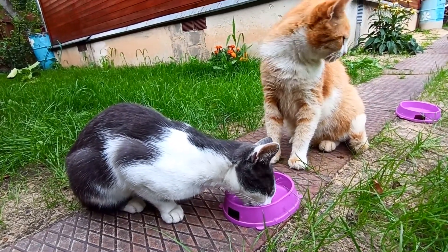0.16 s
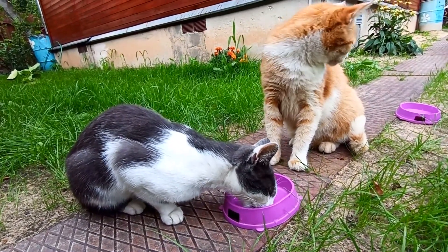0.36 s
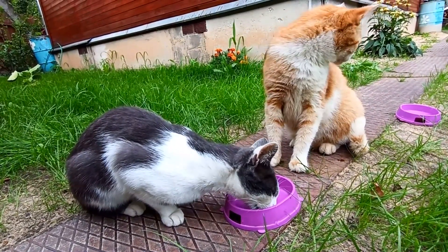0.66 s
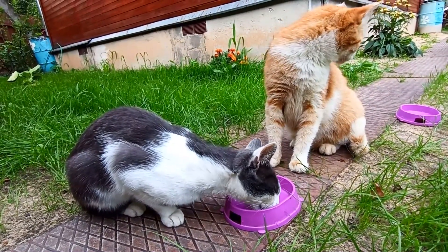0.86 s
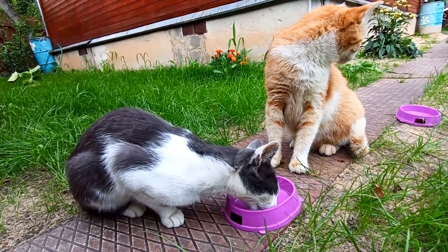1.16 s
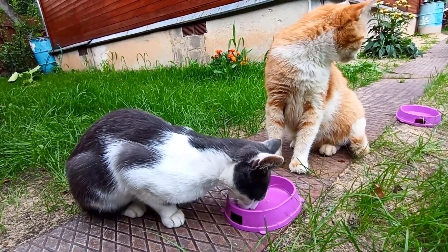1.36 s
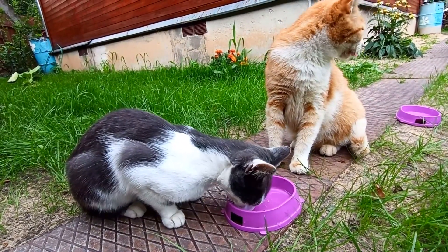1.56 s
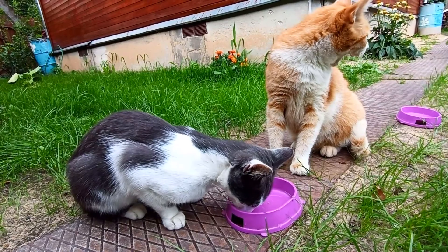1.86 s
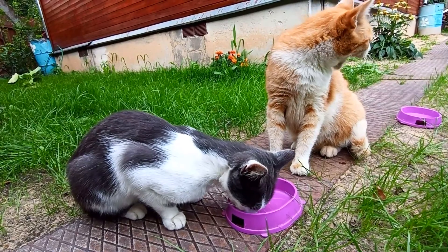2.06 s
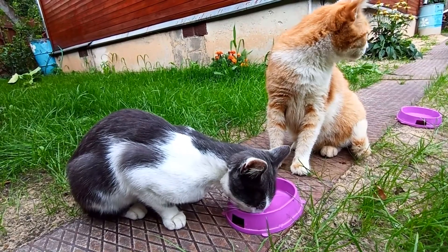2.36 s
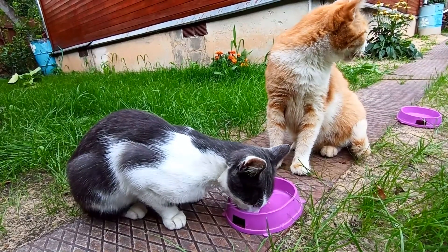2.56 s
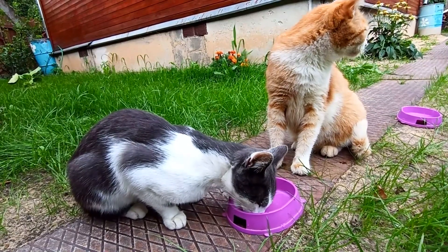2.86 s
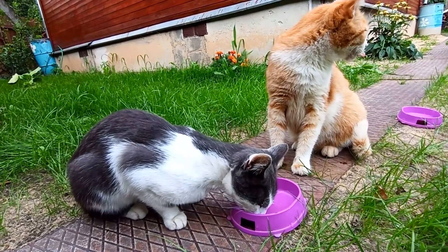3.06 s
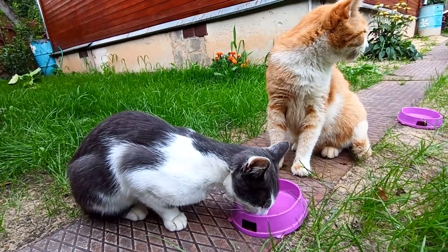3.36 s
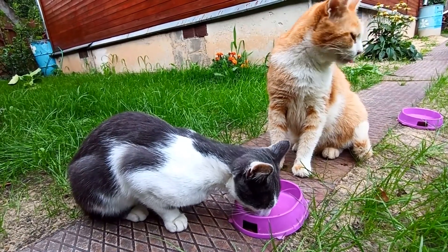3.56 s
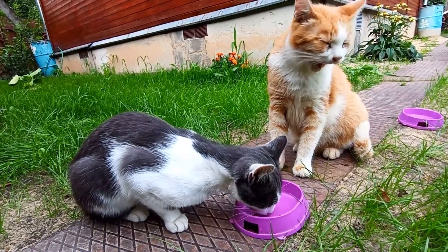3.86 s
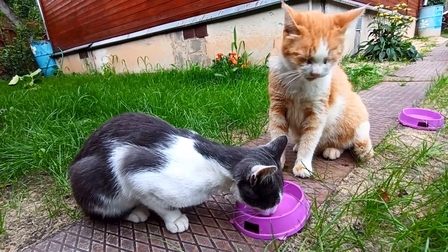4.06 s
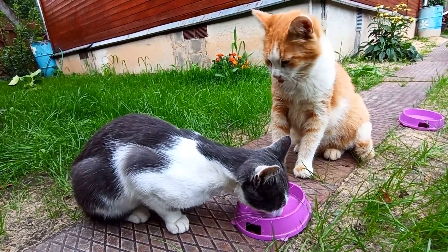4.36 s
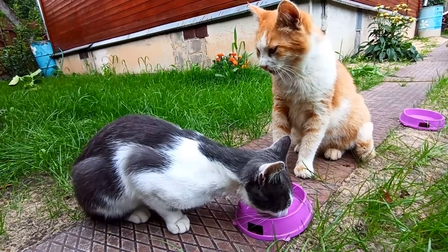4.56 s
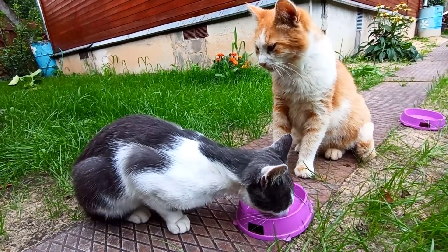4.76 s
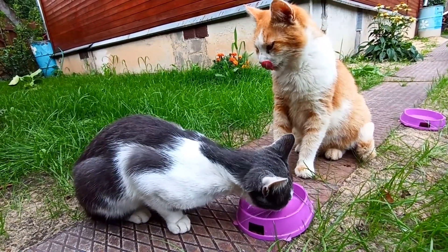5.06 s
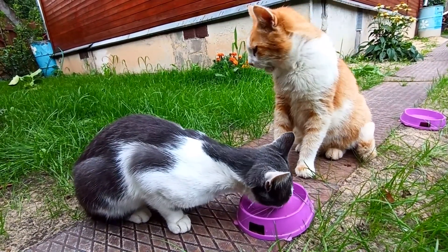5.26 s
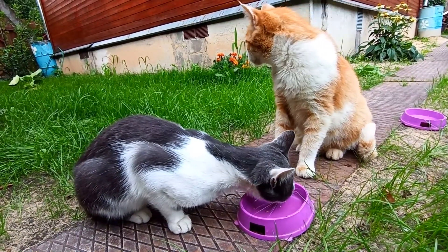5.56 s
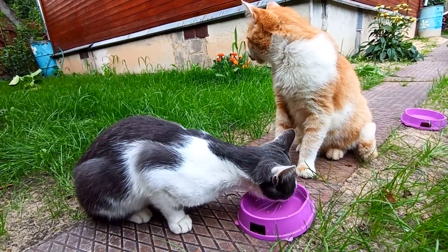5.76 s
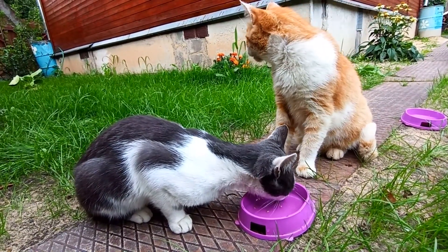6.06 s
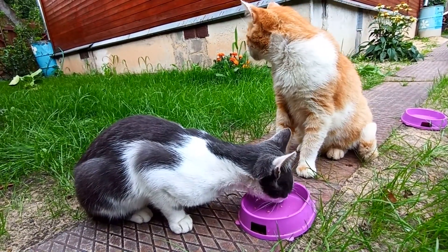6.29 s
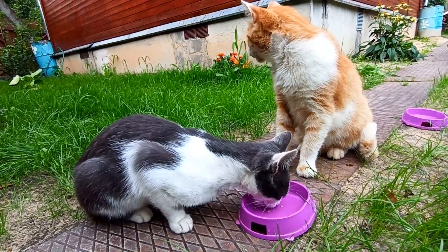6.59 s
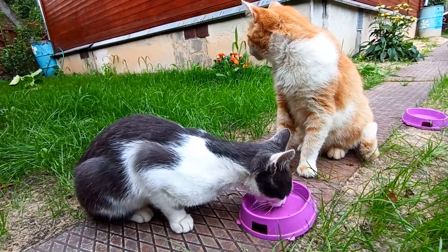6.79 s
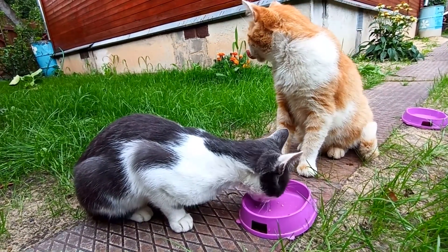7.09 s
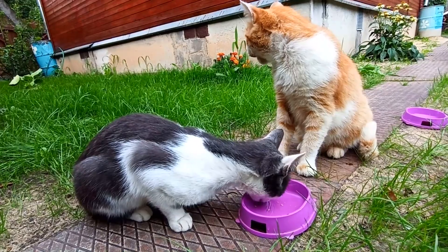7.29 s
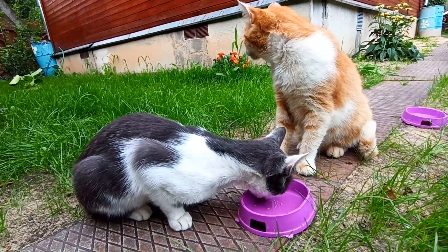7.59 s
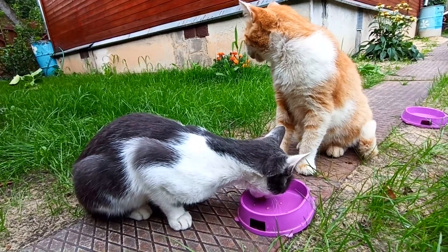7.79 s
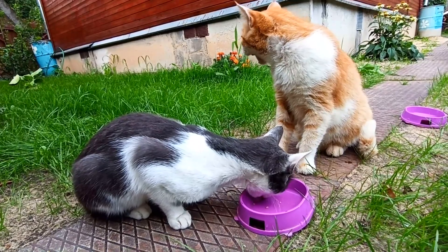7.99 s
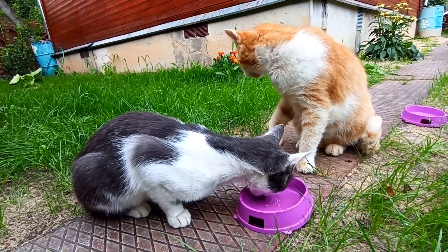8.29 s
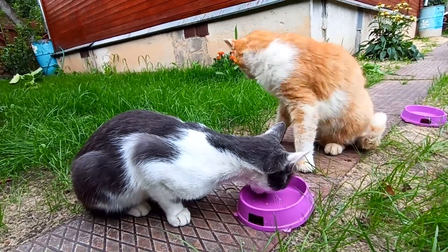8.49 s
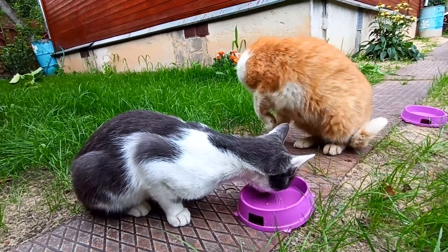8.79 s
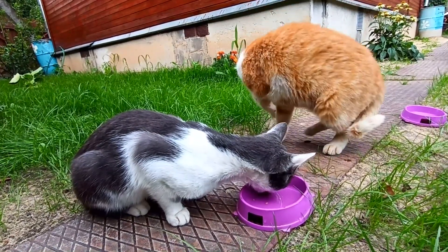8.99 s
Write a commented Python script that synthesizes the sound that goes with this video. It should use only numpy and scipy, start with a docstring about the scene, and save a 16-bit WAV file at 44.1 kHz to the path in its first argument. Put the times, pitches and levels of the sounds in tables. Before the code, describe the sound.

After a faraway dull bang, brittle kibble bites and bowl knocks sound up close as a small bird twitters, whistles and buzzes above low rumble.

```python
"""First a dull bang dies away far off in a yard, over a distant engine's drone, rumble and open air.
A thin hiss swells for almost three seconds, then cuts out. Noise makes these beds, sines the engine's orders.
A songbird close by twitters, alternates pairs of whistles with a falling buzz, then twitters again, all
as gliding sines; others answer faintly. In front a cat crunches dry kibble from a plastic bowl: bursts
of coloured noise for the bites, with small ticks of teeth and pellets and soft knocks between them."""
import sys
import numpy as np
from scipy import signal
from scipy.fft import rfft, irfft, next_fast_len
from scipy.io import wavfile
from scipy.ndimage import map_coordinates

SR = 44100
rng = np.random.default_rng(int(sys.argv[2]) if len(sys.argv) > 2 else 0)


def generate_wav(signal):
    """Clip the signal to [-1, 1] and save it as 16-bit WAV at the path in sys.argv[1]."""
    frames = np.transpose(np.atleast_2d(signal))
    scaled = np.clip(frames, -1, 1) * 32767
    pcm = np.round(scaled).astype(np.int16)
    wavfile.write(sys.argv[1], SR, pcm)


N = 403074  # samples in the scene


def amp(db):
    """Decibels to gain."""
    return 10 ** (np.asarray(db) / 20)


def unit(x):
    """Scale to rms 1."""
    return x / np.sqrt(np.mean(x ** 2) + 1e-20)


def along(points, hz):
    """Read (frequency [Hz], value) points on a log frequency axis."""
    f, v = np.transpose(points)
    return np.interp(np.log(hz + 1), np.log(f + 1), v)


def curves(rows):
    """One value per sample for each column after the time."""
    s, *columns = np.transpose(rows)
    return [np.interp(np.arange(N) / SR, s, column) for column in columns]


def clock(length):
    """Sample times [s] of a sound that lasts length seconds."""
    return np.arange(int(length * SR)) / SR


def wobble(rate, size=N):
    """A smooth random curve with rate knots a second."""
    knots = rng.standard_normal(int(size * rate / SR) + 4)
    return map_coordinates(knots, [np.arange(size) * rate / SR])


def filtered(x, response):
    """Apply a response given as a function of frequency."""
    size = x.shape[-1]
    padded = next_fast_len(size + 4096)
    spectrum = rfft(x, padded) * response(np.fft.rfftfreq(padded, 1 / SR))
    return irfft(spectrum, padded)[..., :size]


def add(out, s, x):
    """Mix x into out from time s."""
    start = max(round(s * SR), 0)
    part = out[..., start:start + x.shape[-1]]
    part += x[..., :part.shape[-1]]


def rush(spectrum, alike, size=N):
    """Stereo noise of rms 1 with a given colour and left-right likeness."""
    def mid_and_side(hz):
        turn = np.arccos(np.clip(along(alike, hz), -1, 1)) / 2
        return amp(along(spectrum, hz)) * [np.cos(turn), np.sin(turn)]

    mid, side = filtered(rng.standard_normal((2, size)), mid_and_side)
    return unit(np.array([mid + side, mid - side]))


def tone(hz):
    """A sine of rms 1 that follows a pitch curve."""
    return np.sqrt(2) * np.sin(2 * np.pi * np.cumsum(hz) / SR)


def gate(t, rise, fall):
    """Smooth opening and closing of a note, in seconds."""
    nearest_end = np.minimum(t / rise, (t[-1] - t) / fall)
    return np.sin(np.pi / 2 * np.clip(nearest_end, 0, 1)) ** 2


def outdoors(x, wet_db, t60, walls):
    """Direct sound plus quickly fading reflections, about walls per second, different in each channel."""
    t = clock(.4)
    arrivals = rng.random((2, len(t))) < walls / SR
    echo = rng.standard_normal((2, len(t))) * arrivals * amp(-60 * t / t60)
    echo /= np.linalg.norm(echo, axis=1, keepdims=True) + 1e-9
    return x + amp(wet_db) * signal.fftconvolve(np.atleast_2d(x), echo, axes=1)[:, :N]


# Speed of the far engine: (time [s], speed [cycles per second])
FAR_ENGINE_SPEED = [(0, 17.0), (.4, 17.1), (.65, 16.3), (1.0, 16.8), (1.5, 17.0), (1.9, 16.0), (2.3, 16.1),
                    (2.75, 17.9), (3.3, 19.15), (4.6, 19.6), (5.5, 18.9), (6.2, 18.7), (6.6, 17.1),
                    (7.1, 16.4), (7.6, 16.4), (8.2, 16.9), (8.7, 16.6), (9.14, 15.9)]
# Strength of the far engine's orders by their pitch: (frequency [Hz], level [dB])
FAR_ENGINE_ORDERS = [(65, -28.5), (84, -8), (100, -5.5), (118, -7), (136, 1.5), (153, -3.5), (170, -11),
                     (187, -21), (205, -12.5), (222, -22.5), (260, -28), (310, -31), (345, -28),
                     (405, -21.5), (450, -33.5)]
# Colour of the low rumble: (frequency [Hz], level per hertz [dB])
RUMBLE_COLOUR = [(25, -24.5), (55, -23), (82, -7.5), (135, 0), (175, -6.5), (210, -5.5), (255, -14),
                 (390, -14), (500, -23), (800, -28), (1300, -47)]
# Colour of the open air around the yard: (frequency [Hz], level per hertz [dB])
AIR_COLOUR = [(290, -34), (500, -0.5), (900, -5), (1450, -7), (2200, -9), (2700, -10), (3000, -10),
              (4600, -8.5), (5000, -22), (5900, -20.5), (6350, -8.5), (7600, -10.5), (9800, -35),
              (12100, -32.5), (15500, -24)]
# The thin hiss as it swells and cuts out: (time [s], level [dB])
HISS_LEVEL = [(0, -65.5), (1.6, -53.5), (2.72, -51), (2.87, -83), (9.14, -96)]
# Left-right likeness of the yard's noise beds and the scuffs: (frequency [Hz], likeness [1 = same])
YARD_LIKENESS = [(30, 0.79), (70, 0.94), (140, 0.9), (280, 0.77), (550, 0.45), (1500, 0.016),
                 (10000, 0.037)]
HUM_DB, RUMBLE_DB, AIR_DB = -35.5, -35, -52.5  # mean gains of engine, rumble and open air
HUM_SWELL_DB, HUM_SWELLS_PER_S = 0.7, 6  # the engine's sound drifts on the air
THROB_DB = 1.5  # every other cycle of the engine is stronger


def background(count):
    """A far engine's orders, from 4 to below count, follow its speed and throb over rumble, air and hiss."""
    cycle = curves(FAR_ENGINE_SPEED)[0] * (1 + 0.004 * wobble(3))
    engine = 0
    for order in range(4, count):
        order_level = along(FAR_ENGINE_ORDERS, order * cycle) + 1.66 * wobble(7)
        engine = engine + amp(order_level) * tone(order * cycle + 1.0 * wobble(10))
    throb = THROB_DB * tone(cycle / 2)
    hum = amp(HUM_DB + HUM_SWELL_DB * wobble(HUM_SWELLS_PER_S) + throb) * engine
    rumble = amp(RUMBLE_DB) * rush(RUMBLE_COLOUR, YARD_LIKENESS)
    air = amp(AIR_DB + 0.8 * wobble(8)) * rush(AIR_COLOUR, YARD_LIKENESS)
    hiss_colour = [(5000, -52.5), (6900, -3.5), (7700, 13.0), (8600, -1), (11000, -36.0), (15000, -29.0)]
    hiss = amp(curves(HISS_LEVEL)[0]) * rush(hiss_colour, YARD_LIKENESS)
    return (hum + rumble) * amp([[.2], [-.2]]) + air + hiss


# Colour of the far bang before its ring: (frequency [Hz], level per hertz [dB])
BANG_COLOUR = [(120, -23.5), (205, 0.5), (266, -18), (315, 0.5), (360, -15.5), (504, -10.5), (680, -19),
               (894, -14.5), (1250, -19), (1660, -29), (2300, -25), (5600, -40), (7400, -32), (8500, -36.5),
               (9500, -64.5)]
BANG_RING_HZ, BANG_RING_WIDTH_HZ, BANG_RING_DB = 898, 76, 8.5  # one pitch stands out


def bang():
    """Dull noise with one emphasized pitch; an uneven decay stands for lumpy echoes among the houses."""
    level, = curves([(0, -60), (.012, -41), (.022, -28), (.075, -28), (.17, -38), (.45, -57.5), (.9, -110)])

    def ring(hz):
        return amp(BANG_RING_DB / (1 + (2 * (hz - BANG_RING_HZ) / BANG_RING_WIDTH_HZ) ** 2))

    noise = rush(BANG_COLOUR, [(200, 1.0), (1000, 0.22)])
    return amp(level + 1.5 * wobble(120)) * unit(filtered(noise, ring))


# Faint answers from far birds:
# (time [s], length [s], start pitch [Hz], end pitch [Hz], level [dB])
FAR_ANSWERS = [(1.162, 0.14, 4800, 4300, -62), (1.45, 0.11, 8000, 6900, -52),
               (1.651, .11, 7280, 6700, -47.5), (6.57, 0.21, 2590, 2760, -64),
               (7.136, 0.15, 2540, 2850, -60), (7.647, 0.12, 2810, 2950, -58.5)]


def answers(roughness_hz):
    """Far birds: thin sines glide with a rough pitch, swell and fade."""
    out = np.zeros(N)
    for s, length, start_hz, end_hz, db in FAR_ANSWERS:
        t = clock(length)
        pitch = np.interp(t, [0, length], [start_hz, end_hz])
        pitch += roughness_hz * wobble(495, size=len(t))
        add(out, s, amp(db) * gate(t, 0.0088, 0.018) * tone(pitch))
    return out


# Slurred notes of the near bird, one curve each: (time [s], pitch [Hz], level [dB])
SLURRED_NOTES = [
    [(.879, 3435, -36.5), (.898, 3490, -31), (.909, 3950, -49)],
    [(.902, 2360, -51), (.917, 2570, -47), (.926, 2880, -38), (.935, 2750, -43), (.947, 3140, -31),
     (.957, 3014, -36), (.970, 3150, -31.5), (.993, 3030, -35.5)],
    [(1.340, 3280, -48), (1.359, 3500, -57)],
    [(1.945, 2880, -44), (1.954, 2600, -41), (1.972, 2850, -48)],
    [(1.974, 3530, -27), (1.987, 3465, -28.5), (1.995, 3650, -24), (2.08, 3610, -30), (2.122, 3355, -29),
     (2.134, 2980, -34.5), (2.145, 2300, -57)],
    [(7.910, 3850, -37), (7.915, 3300, -32.5), (7.921, 3300, -47), (7.929, 3220, -55), (7.935, 2750, -57)],
    [(8.262, 5220, -52), (8.280, 10300, -38), (8.293, 6360, -49), (8.305, 4960, -24.5)],
    [(8.304, 5900, -42), (8.318, 4120, -27.5), (8.336, 3410, -37)],
    [(8.538, 5830, -45), (8.544, 5030, -34.5), (8.551, 3700, -43)],
    [(8.664, 5200, -44), (8.671, 6260, -55), (8.678, 5030, -35), (8.684, 4280, -36), (8.691, 4720, -37),
     (8.695, 5340, -38), (8.703, 3680, -35)],
]


def slurs():
    """Pure notes glide from pitch to pitch."""
    out = np.zeros(N)
    for rows in SLURRED_NOTES:
        s, hz, db = np.transpose(rows)
        t = clock(max(s[-1] - s[0], .005))
        pitch = np.interp(s[0] + t, s, hz) + 18 * wobble(161, size=len(t))
        level = np.interp(s[0] + t, s, db)
        add(out, s[0], amp(level) * gate(t, 0.0011, 0.0017) * tone(pitch))
    return out


# Two-voiced wheezes of the near bird: (time [s], length [s], pitch [Hz], opening rise [Hz], drift [Hz],
# first gap between voices [Hz], last gap [Hz], trill scale [Hz], level [dB], upper voice [dB])
WHEEZE_NOTES = [(0.999, 0.052, 2640, 200, -28, 557, 607, 15, -47.5, 8.5),
                (1.088, 0.072, 2820, 298, -150, 523, 440, 15, -54.5, 7.5),
                (1.154, 0.2, 2674, 40, 242, 317, 480, 8, -57, 7.5),
                (2.18, 0.16, 3010, 169, 84, 373, 427, 8, -58.5, 11),
                (7.927, 0.25, 3630, 40.2, 164, 430, 301, 25, -52.5, 0.5),
                (8.449, .094, 5610, 2500, -1650, 556, 2130, 150, -37.5, -4),
                (8.589, .090, 4390, 1040, -200, 755, 850, 160, -37.5, -1),
                (8.737, .118, 4630, 1290, -600, 640, 750, 160, -40.5, -3),
                (8.893, 0.1, 3750, 450, -120, 400, 430, 43, -49, 1)]
WHEEZE_RISE_SHARE = .35  # time constant of the opening rise, as a share of the note
TRILL_HZ, TRILL_SLOWING = 181, 0.55  # mean opening rate; share of it lost by the end of a note


def wheezes():
    """Both sides of the syrinx sing and beat harshly; pitch scoops up, trills and drifts as the gap shifts."""
    out = np.zeros(N)
    for (s, length, hz, rise_hz, drift_hz, first_gap_hz, last_gap_hz,
         trill_hz, db, upper_db) in WHEEZE_NOTES:
        t = clock(length)
        progress = t / length
        arch = np.sin(np.pi * progress)
        rate = TRILL_HZ * (1 - TRILL_SLOWING * progress) * (1 + 0.13 * wobble(48, size=len(t)))
        trill = np.sqrt(arch * (1 - progress)) * tone(rate) + 0.31 * wobble(700, size=len(t))
        scoop = rise_hz * np.exp(-progress / WHEEZE_RISE_SHARE)
        pitch = hz + drift_hz * progress + trill_hz * trill - scoop + 14 * wobble(145, size=len(t))
        gap = first_gap_hz + (last_gap_hz - first_gap_hz) * progress
        gap *= 1 + 0.047 * wobble(120, size=len(t))
        # the coupled sides add a combination tone
        upper = tone(pitch + gap) + amp(-19) * tone(pitch + 2 * gap)
        voices = tone(pitch) + amp(upper_db) * np.sqrt(arch) * upper
        level = db + 2 * (arch - .7) + 1.7 * wobble(74, size=len(t))
        add(out, s, amp(level) * gate(t, 0.0035, 0.0072) * voices)
    return out


# Chips of the near bird: (time [s], length [s], top pitch [Hz], share of the chip before the top,
# fall one chip length from the top [Hz], level [dB])
CHIP_NOTES = [(0.862, 0.021, 3030, 0.49, 656, -44.5), (1.054, .017, 2950, 0.55, 600, -39.5),
              (7.341, .010, 3750, .1, 500, -54), (7.364, 0.009, 3500, .1, 600, -46),
              (7.394, .012, 3280, 0.59, 700, -44.5), (7.481, 0.0092, 5300, 0.51, 1310, -40.5),
              (7.488, 0.0077, 4320, .1, 900, -40.5), (7.610, 0.0077, 3700, .15, 550, -34.5),
              (7.620, 0.0081, 4970, .15, 1200, -45.5), (7.632, .007, 3430, .1, 700, -38),
              (7.676, 0.013, 3900, 0.47, 1400, -32.5), (7.69, 0.01, 5400, .5, 900, -46),
              (7.726, .005, 5200, .9, 1400, -41), (7.733, 0.0061, 3530, .09, 900, -37.5),
              (7.786, .013, 3960, 0.37, 1380, -29.5), (7.802, 0.0085, 5380, .5, 900, -48),
              (7.831, 0.029, 3230, 0.48, 650, -52), (7.845, 0.0065, 4500, 0.37, 700, -40.5),
              (7.852, 0.0054, 3460, 0.12, 900, -39), (7.906, 0.0043, 4150, .5, 900, -37),
              (8.343, 0.02, 5900, 0.49, 2000, -41)]


def chips():
    """Very short notes: the pitch arches up to a top and drops away."""
    out = np.zeros(N)
    for s, length, top_hz, top_share, drop_hz, db in CHIP_NOTES:
        t = clock(length)
        pitch = top_hz - drop_hz * np.abs(t / length - top_share) ** 1.01
        add(out, s, amp(db) * gate(t, 0.0013, 0.0037) * tone(pitch))
    return out


# Falling buzzes of the near bird:
# (time [s], length [s], top pitch [Hz], held pitch [Hz], head level [dB], tail level [dB])
BUZZ_NOTES = [(3.481, 0.3, 3460, 3250, -33.5, -47.5), (4.277, 0.32, 4200, 3430, -28.5, -44.5),
              (5.099, 0.29, 4230, 3510, -28, -39), (5.939, 0.301, 4270, 3540, -28, -40.5),
              (6.748, 0.29, 4140, 3437, -28, -39.5)]
BUZZ_HEAD_S, BUZZ_SAG_HZ_PER_S = 0.15, 452  # time to reach the tail level; sinking of the held pitch
BUZZ_TOP_S, BUZZ_SCOOP_HZ = 0.011, 200  # the pitch scoops up to its top before it falls
RASP_DB, RASP_GAP_HZ, RASP_FADE_DB_PER_S = -8.5, 289.5, 52  # a second, higher voice roughens the head


def buzzes(flutter_hz, depth_hz):
    """An arching, falling note with fast pitch flutter; a loud, rasping head sinks to a quiet held tail."""
    out = np.zeros(N)
    for s, length, top_hz, held_hz, head_db, tail_db in BUZZ_NOTES:
        t = clock(length)
        fall = np.exp(-(np.maximum(t - BUZZ_TOP_S, 0) / 0.021) ** 1.3)
        pitch = held_hz - BUZZ_SAG_HZ_PER_S * np.maximum(t - .1, 0) + (top_hz - held_hz) * fall
        pitch -= BUZZ_SCOOP_HZ * np.maximum(1 - t / BUZZ_TOP_S, 0)
        pitch += 34 * wobble(500, size=len(t)) + 20 * wobble(35, size=len(t))
        flutter = tone(flutter_hz * (1 + 0.018 * wobble(70, size=len(t))))
        pitch += depth_hz * flutter * (1 - np.exp(-t / BUZZ_TOP_S))
        rasp_pitch = pitch + RASP_GAP_HZ + 60 * wobble(300, size=len(t))
        rasp = amp(RASP_DB - RASP_FADE_DB_PER_S * t) * tone(rasp_pitch)
        head_shape = [head_db - 12.5, head_db - 1.0, head_db - 3.5, tail_db]
        level = np.interp(t / BUZZ_HEAD_S, [0, .25, .55, 1], head_shape)
        level = level - 1.8 * flutter + 1.1 * wobble(90, size=len(t))
        add(out, s, amp(level) * gate(t, 0.0082, 0.038) * (tone(pitch) + rasp))
    return out


# Whistles of the near bird: (time [s], length [s], level [dB], pitch [Hz], sag [Hz per s],
# fade [dB per s], left minus right [dB], depth of the closing dip [Hz])
WHISTLE_NOTES = [(3.85, 0.11, -30.5, 4858, 100, 9, -1.5, 16), (4.056, 0.1, -28.5, 4906, 500, 18, 0.5, 13),
                 (4.66, 0.11, -29, 4968, -3, 10, -1, 77), (4.864, 0.102, -28.5, 4962, -200, 13, 2, 113),
                 (5.465, 0.11, -30.5, 4980, 1499, 115, 2.5, 3), (5.708, 0.12, -28, 4886, 298, -4, 3, 15),
                 (6.318, 0.1, -26, 4980, 1402, 50, -2, 0), (6.523, 0.11, -28.5, 4885, 900, 29, 4.5, 106)]
# Faint overtones of a whistle: (multiple of its pitch, level [dB])
WHISTLE_OVERTONES = [(1.801, -23), (2, -27.5)]
SETTLE_HZ, SETTLE_S = 170, 0.0049  # it starts sharp and settles
SWELL_DB, SWELL_S = 13.5, 0.0067  # it starts soft and swells
DIP_LEAD_S, DIP_S = 0.025, 0.0093  # the closing dip: time before the end, width
FLICK_HZ, FLICK_S = 170, 0.0082  # it ends with an upward flick


def whistles():
    """Nearly pure notes settle, sag, dip and flick up, with a slight quaver and faint overtones."""
    out = np.zeros((2, N))
    for s, length, db, hz, sag, fade_db, pan_db, dip_hz in WHISTLE_NOTES:
        t = clock(length)
        from_middle, left = t - length / 2, length - t
        flick = FLICK_HZ * np.exp(-left / FLICK_S)
        dip = dip_hz * np.exp(-((left - DIP_LEAD_S) / DIP_S) ** 2)
        pitch = hz + SETTLE_HZ * np.exp(-t / SETTLE_S) - sag * from_middle + flick - dip
        pitch += 14 * wobble(230, size=len(t)) + 9 * wobble(44.4, size=len(t))
        level = db - fade_db * from_middle - SWELL_DB * np.exp(-t / SWELL_S) + wobble(67, size=len(t))
        voice = tone(pitch)
        for multiple, over_db in WHISTLE_OVERTONES:
            voice = voice + amp(over_db) * tone(multiple * pitch)
        pan = amp([[pan_db / 2], [-pan_db / 2]])
        add(out, s, amp(level) * gate(t, 0.0026, 0.024) * voice * pan)
    return out


# Soft knocks in the bowl: (time [s], level before attack and decay [dB], pitch [Hz])
SOFT_KNOCKS = [(.344, -41, 1110), (.412, -36.5, 820), (.666, -39, 1160), (.916, -38, 806),
               (1.989, -37, 800), (2.379, -31, 1320), (2.4088, -22, 1193), (2.956, -35.5, 1270),
               (2.998, -20.5, 2710), (2.999, -26, 1210), (4.263, -35.5, 1890), (4.337, -34.5, 760),
               (5.175, -34.5, 775), (5.227, -38.5, 795), (6.968, -36, 1450)]
KNOCK_ATTACK_S, KNOCK_T60_S = 0.0019, 0.028  # a padded contact; its ring
KNOCK_LOW_DB, SCUFF_DB = -9, -4.5  # lower mode and dry pellet scuff, relative to the main mode


def knocks():
    """A pellet scuffs the bowl, which rings briefly in a woody mode and a weaker lower one."""
    out, t = np.zeros(N), clock(.06)
    for s, db, hz in SOFT_KNOCKS:
        pitch = hz * (1 + 0.044 * wobble(400, size=len(t)))
        scuff_colour = [(hz / 5, -30), (hz / 2, -5), (hz, 0), (hz * 2, -8), (hz * 6, -28)]
        scuff = rush(scuff_colour, YARD_LIKENESS, size=len(t))[0]
        ring = tone(pitch) + amp(KNOCK_LOW_DB) * tone(.66 * pitch) + amp(SCUFF_DB) * scuff
        attack = 1 - np.exp(-t / KNOCK_ATTACK_S)
        add(out, s, amp(db - 60 * t / KNOCK_T60_S) * attack * ring)
    return outdoors(out, wet_db=-13, t60=.09, walls=2600) * amp([[-2.2], [2.2]])


# Sharp ticks of teeth and pellets: (time [s], onset level before the ticks' common gain [dB], pitch [Hz])
SHARP_TICKS = [(.2394, -34, 7100), (1.5673, -33.5, 7000), (1.582, -37, 15000), (1.6267, -33, 6800),
               (1.7714, -33, 6830), (1.9432, -23.5, 7280), (2.4857, -34, 7000), (2.5517, -34.5, 7040),
               (2.717, -30.5, 7020), (5.268, -40, 4500), (5.411, -41.5, 6800), (7.961, -35.5, 7000),
               (7.3672, -41.5, 6930), (7.664, -32, 6900), (7.671, -33, 7000), (8.2015, -30, 6900),
               (8.3064, -32, 6960), (8.470, -28, 6400), (8.5966, -32, 7030), (9.0817, -32.5, 7230)]
TICK_HZ = 7020  # where a chance tick rings, give or take 5 %
FAINT_TICK_DB, FAINT_SPREAD_DB = -39.5, 1  # chance ticks, before the common gain


def chewing(count):
    """The sharp ticks plus count faint ones at chance times, as rows like those of the table."""
    faint = []
    for _ in range(count):
        s = rng.uniform(0, N / SR)
        db = FAINT_TICK_DB + FAINT_SPREAD_DB * rng.standard_normal()
        faint.append((s, db, TICK_HZ * np.exp(0.05 * rng.standard_normal())))
    return list(SHARP_TICKS) + faint


def contacts(rows, gain_db, t60, octaves, skirt_db):
    """Each small contact rings for a moment in one broad resonance of noise."""
    out, t = np.zeros((2, N)), clock(0.067)
    for s, db, hz in rows:
        shape = [(hz / 8, skirt_db - 4.5), (hz / 2 ** octaves, skirt_db), (hz, 0),
                 (hz * 2 ** octaves, skirt_db), (hz * 8, skirt_db - 18.5)]
        ring = rush(shape, [(1000, 0.88), (7000, 0.11)], size=len(t))
        add(out, s, amp(db + gain_db - 60 * t / t60) * ring)
    return outdoors(out, wet_db=-6, t60=0.1, walls=1500)


# Resonances of the plastic bowl: (frequency [Hz], width [Hz], lift [dB])
BOWL_RESONANCES = [(717, 230, 12), (1257, 200, 8.5), (1776, 86, 10), (2014, 170, 6.5), (2600, 210, 5.5),
                   (4030, 1000, 1.5), (6350, 400, 5.5), (7340, 120, 14.5)]


def bowl(hz):
    """Gain of the bowl's resonances, each a bell-shaped lift in decibels."""
    return amp(sum(db / (1 + (2 * (hz - centre) / width) ** 2) for centre, width, db in BOWL_RESONANCES))


# Colour of breaking kibble before the bowl: (frequency [Hz], level per hertz [dB])
KIBBLE_COLOUR = [(250, -37), (500, -14.5), (800, -10.5), (1300, -6.5), (2200, -10.5), (3800, -3),
                 (4600, -8.5), (5300, -18), (6500, -7.5), (7500, -16), (8600, -20.5), (9800, -23),
                 (12300, -27.5), (15500, -26)]
BODY_OCTAVES = 0.22  # width of the lift around one pitch


def kibble(size, tilt_db, body_hz, body_db):
    """Breaking kibble in the bowl, lifted at one pitch and tilted, as stereo noise of rms 1."""
    grit = rush(KIBBLE_COLOUR, [(800, 0.7), (4000, 0.15), (9000, 0.21)], size=size)

    def response(hz):
        body = body_db * np.exp(-(np.log2((hz + 1) / body_hz) / BODY_OCTAVES) ** 2)
        tilt = tilt_db * np.log2(np.clip(hz, 700, 8000) / 3000)
        return bowl(hz) * amp(body + tilt)

    return unit(filtered(grit, response))


# The cat's bites: (time [s], length [s], level before balance [dB], treble tilt [dB per octave],
# pitch of the mouth's hollow [Hz], its lift [dB])
CAT_BITES = [(0.6, 0.0087, -34.5, 0, 1460, 7), (1.129, 0.013, -40, 0, 1350, 1),
             (1.738, .003, -39, 1.5, 1520, 12), (2.093, 0.018, -33, -2.5, 1510, 6),
             (2.378, 0.0026, -41.5, 2, 1330, 4), (2.397, .018, -39, 0, 1750, 2.5),
             (2.667, 0.026, -41.5, -2, 1400, 4), (2.981, 0.016, -30.5, -1.5, 1710, 3.5),
             (2.998, 0.028, -27, 2, 2160, 3.5), (3.29, 0.013, -39.5, 0.5, 2050, 7),
             (4.253, 0.016, -40, 1.5, 1880, 6), (4.560, 0.015, -42, 2, 1380, 1),
             (6.839, .018, -43.5, 1.5, 2200, 3), (8.024, .006, -35, 2, 1350, 5.5),
             (8.042, .009, -39, 1, 2600, 6), (8.09, 0.027, -41, 1.5, 1400, 3),
             (8.484, 0.017, -31, 2.5, 1500, 6), (8.775, .019, -36, 1.5, 2150, 1)]
# Sharp cracks as a pellet splits: (time [s], onset level before balance [dB],
# treble tilt [dB per octave], pitch of the split [Hz])
PELLET_CRACKS = [(0.6008, -28, 1, 1380), (0.603, -24.5, -3.5, 4100), (1.145, -30, -5, 1360),
                 (1.738, -34, -4.5, 1450), (2.075, -30.5, -4.5, 2700), (2.1059, -27, -4.5, 1800),
                 (2.4092, -38.5, 0, 1800), (2.683, -35.5, -3.5, 1400), (2.972, -32.5, 1.5, 3700),
                 (2.984, -24, 0.5, 3100), (2.998, -17.5, 5, 7250), (2.9996, -21, 2.5, 1800),
                 (3.0095, -23, 3.5, 7050), (3.297, -35.5, 0.5, 6400), (4.2659, -28, 4, 1900),
                 (6.854, -40.5, 5.5, 2400), (7.163, -36, -0.5, 3740), (7.367, -32.5, 0, 3800),
                 (8.467, -35, -3, 1700), (8.4834, -23.5, 3.5, 2840), (8.492, -33, 4.5, 4200),
                 (8.7779, -28, 13, 3700)]
BUILD_S, CRUMBLE_S = 0.018, 0.017  # a bite swells and fades by 20 dB in these times
FRACTURE_SPREAD_DB, FRACTURES_PER_S = 3, 1600  # unevenness of the micro-fractures
CRACK_T60_S, CRACK_LIFT_DB = 0.012, 6.5


def bites():
    """Micro-fractures crowd while the jaw presses, then thin out; a pellet splits with a sharp crack."""
    out = np.zeros((2, N))
    lead = .05  # s of swelling before the bite's own time
    t = clock(3 * lead) - lead
    for s, length, db, tilt_db, body_hz, body_db in CAT_BITES:
        outside = np.maximum(-t / BUILD_S, (t - length) / CRUMBLE_S)
        load = amp(-20 * np.maximum(outside, 0))
        fractures = amp(FRACTURE_SPREAD_DB * wobble(FRACTURES_PER_S, size=len(t)))
        # unevenness leaves the energy of the bite's envelope unchanged
        fractures /= np.sqrt(np.sum((fractures * load) ** 2) / np.sum(load ** 2))
        add(out, s - lead, amp(db) * load * fractures * kibble(len(t), tilt_db, body_hz, body_db))
    t = clock(lead)
    for s, db, tilt_db, hz in PELLET_CRACKS:
        add(out, s, amp(db - 60 * t / CRACK_T60_S) * kibble(len(t), tilt_db, hz, CRACK_LIFT_DB))
    return outdoors(out, wet_db=-15.5, t60=0.08, walls=8600) * amp([[-1.7], [1.7]])


def scene():
    """The yard from far to near: distant sounds, the birds, then the cat at its bowl."""
    far = background(count=25) + bang()
    song = answers(roughness_hz=110) + slurs() + wheezes() + chips()
    song = song + buzzes(flutter_hz=216, depth_hz=158) + whistles()
    lag = 2e-5  # s between channels; the birds sit a little to one side
    song = filtered(song, lambda hz: np.exp(1j * np.pi * hz * lag * np.array([[1], [-1]])))
    birds = outdoors(song, wet_db=-17, t60=.48, walls=900)
    ticks = contacts(chewing(count=12), gain_db=-1.0, t60=0.017, octaves=0.32, skirt_db=-20.5)
    return far + birds + knocks() + ticks + bites()


# Treble dip of the microphone: (frequency [Hz], level [dB])
MICROPHONE_RESPONSE = [(8450, -1), (9100, -22), (11300, -12), (11700, -2)]
TOP_HZ = 15800  # nothing passes above this


def record(dry):
    """The microphone has a dip in the treble and a steep band limit."""
    return filtered(dry, lambda hz: amp(along(MICROPHONE_RESPONSE, hz)) * (hz < TOP_HZ))


dry = scene()
out = record(dry)
generate_wav(out)
```